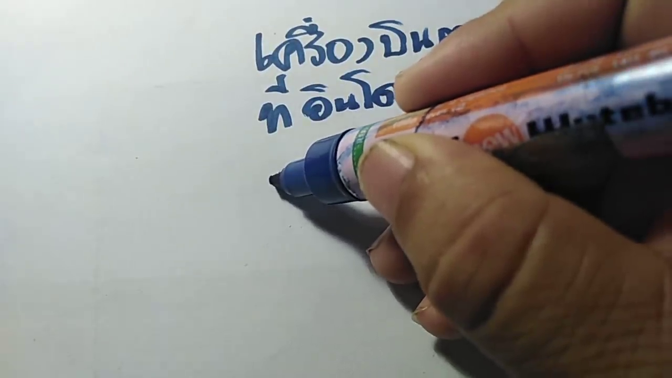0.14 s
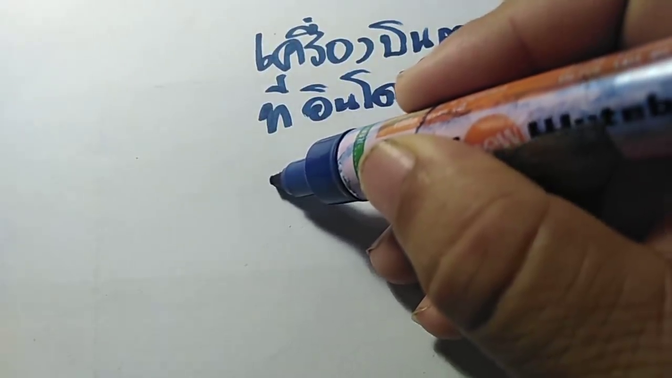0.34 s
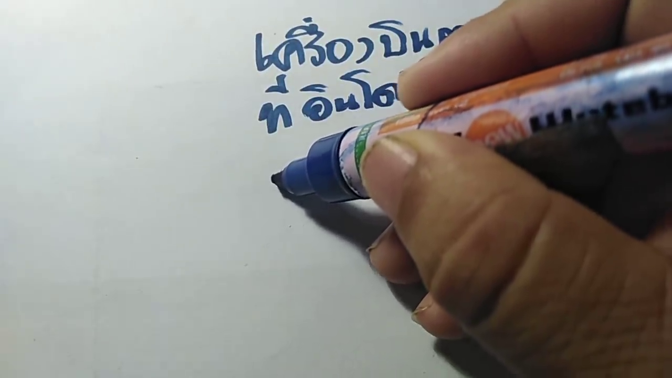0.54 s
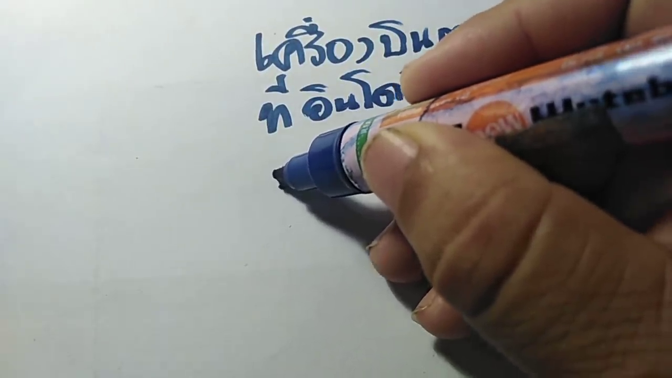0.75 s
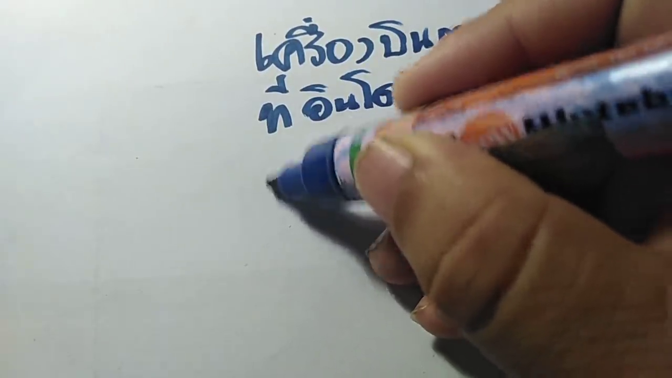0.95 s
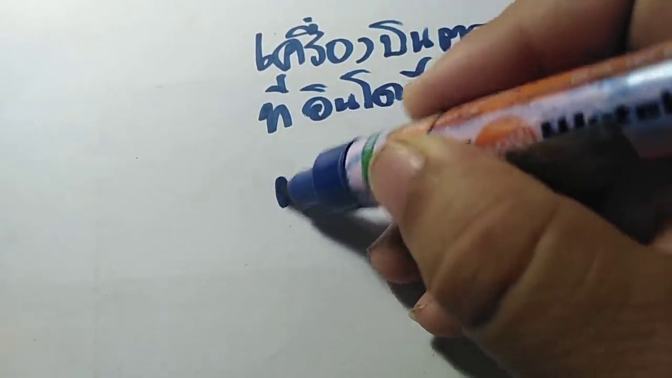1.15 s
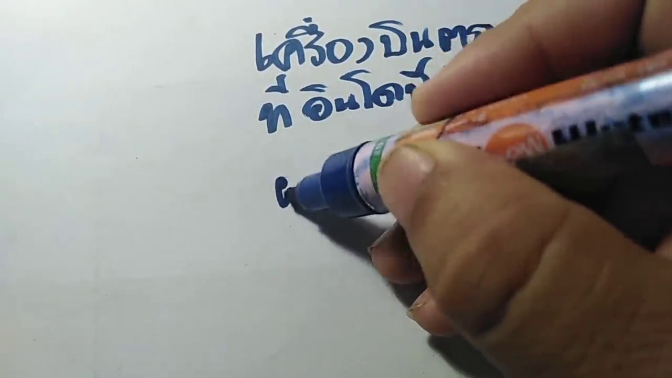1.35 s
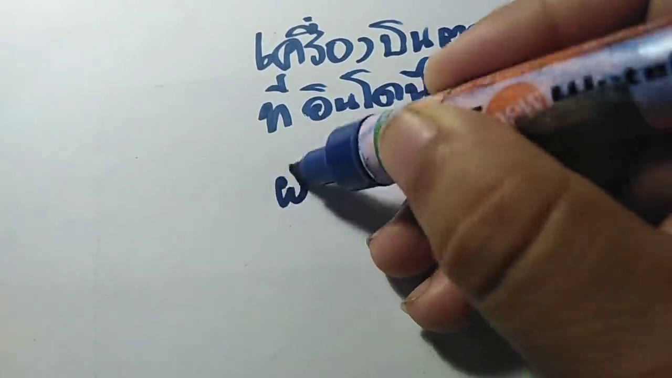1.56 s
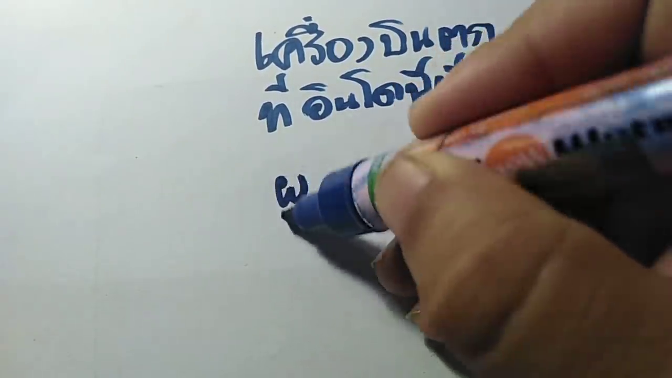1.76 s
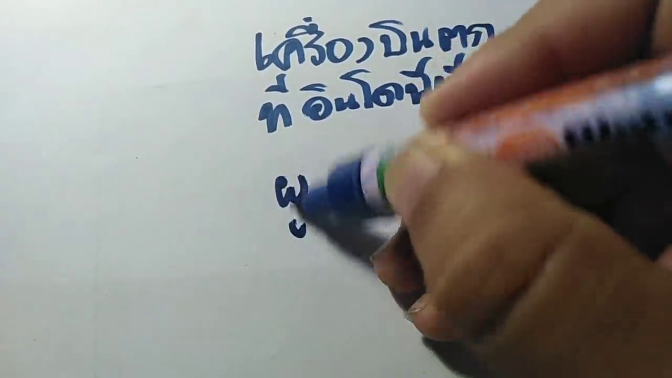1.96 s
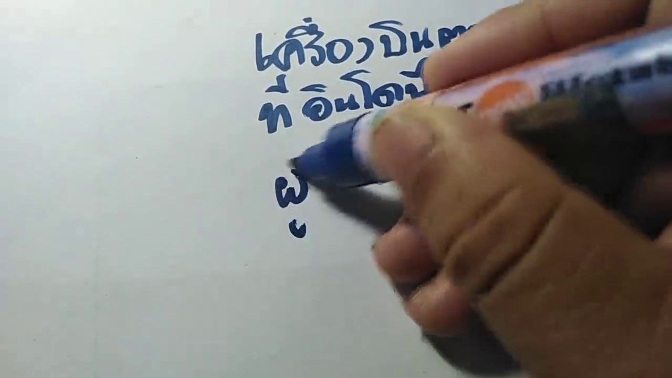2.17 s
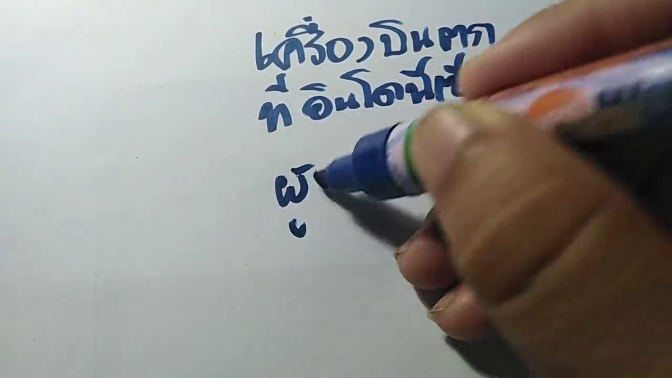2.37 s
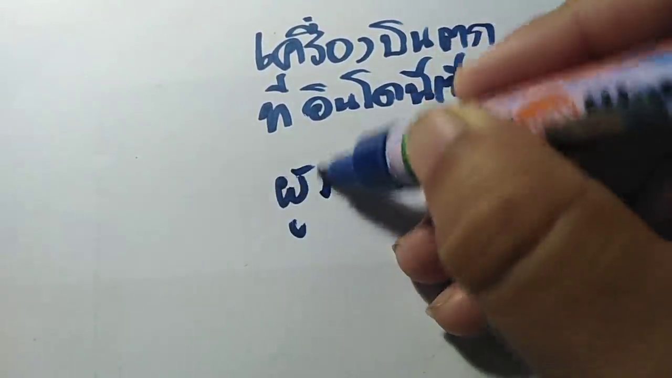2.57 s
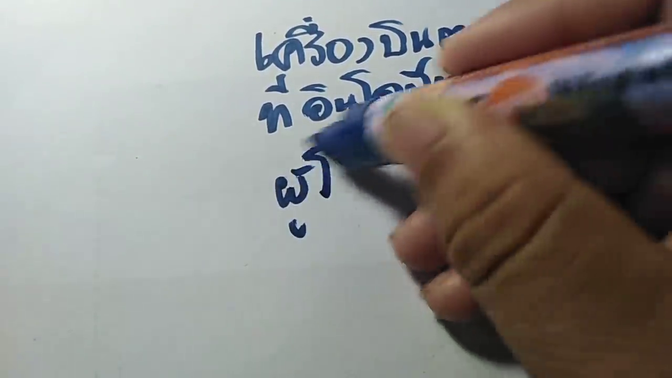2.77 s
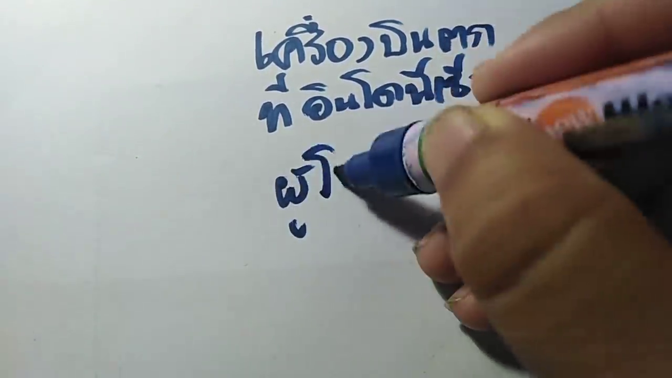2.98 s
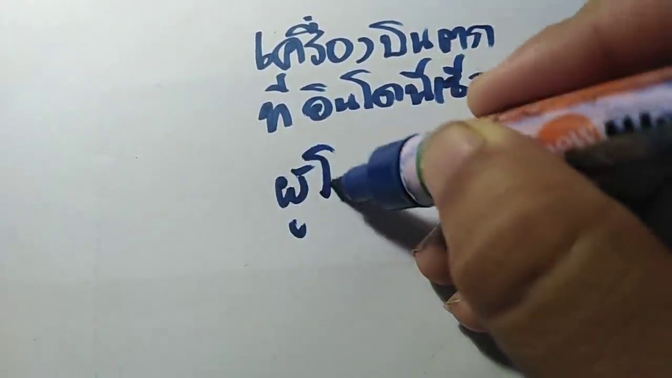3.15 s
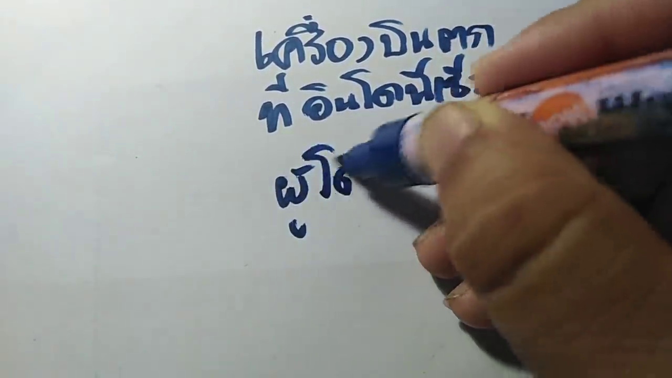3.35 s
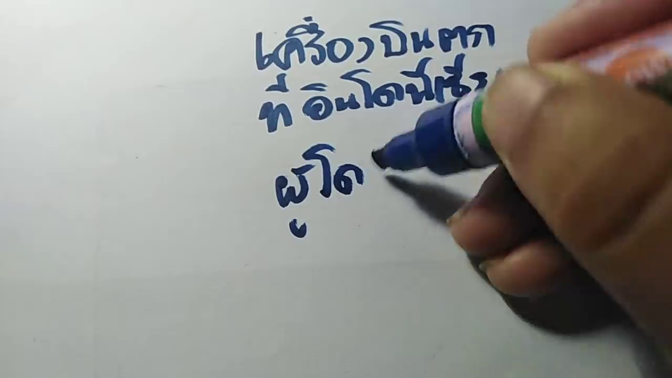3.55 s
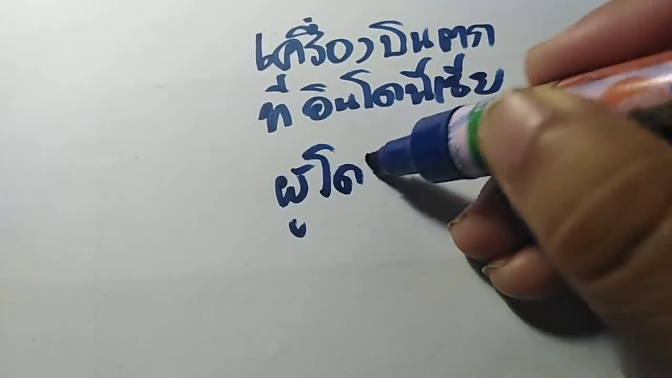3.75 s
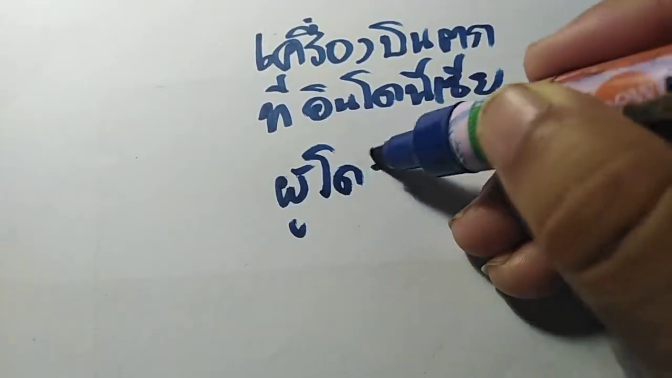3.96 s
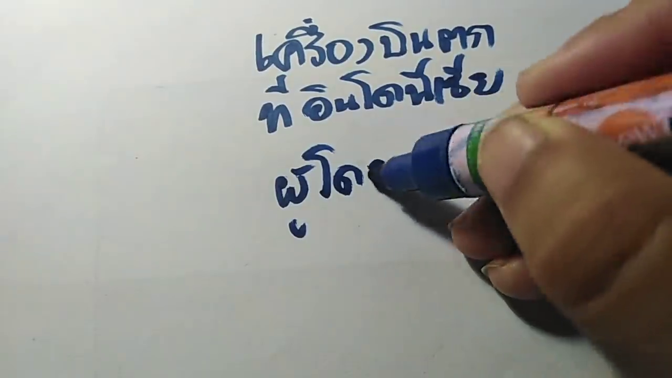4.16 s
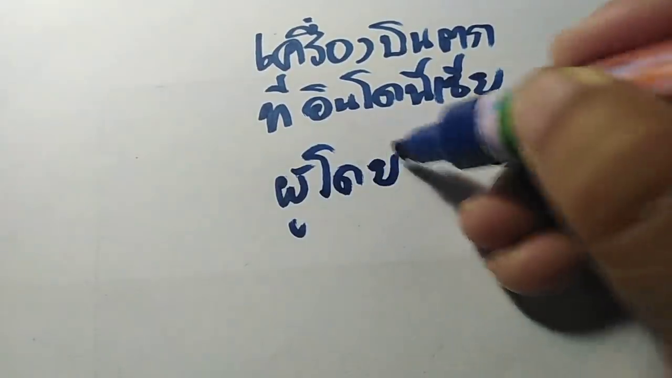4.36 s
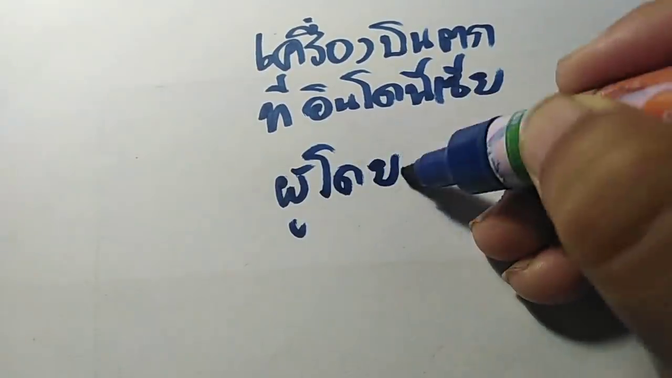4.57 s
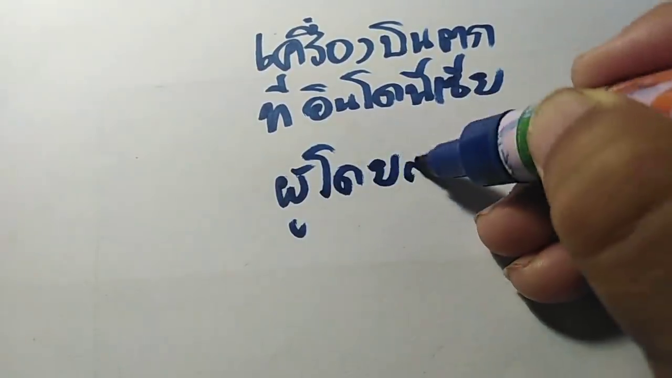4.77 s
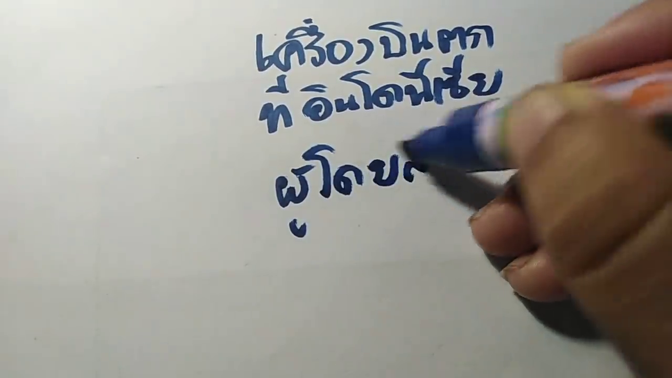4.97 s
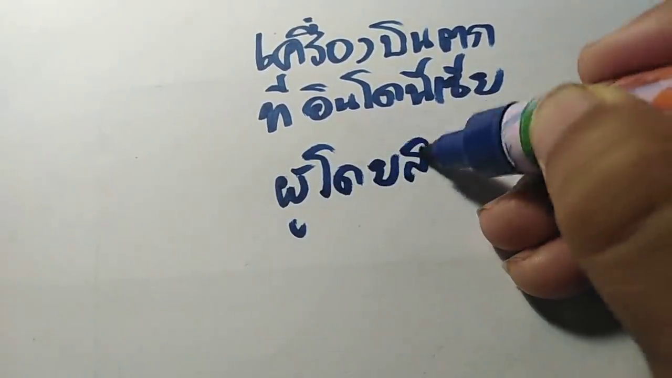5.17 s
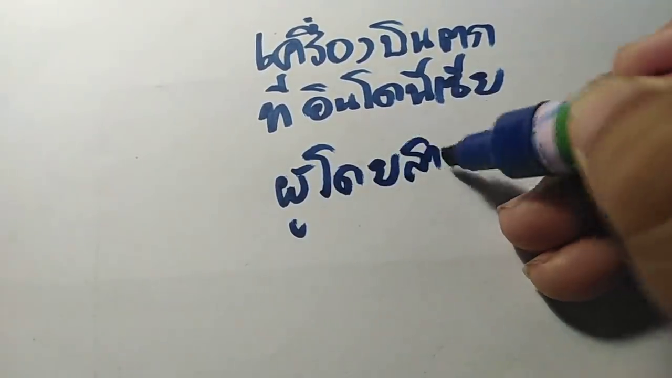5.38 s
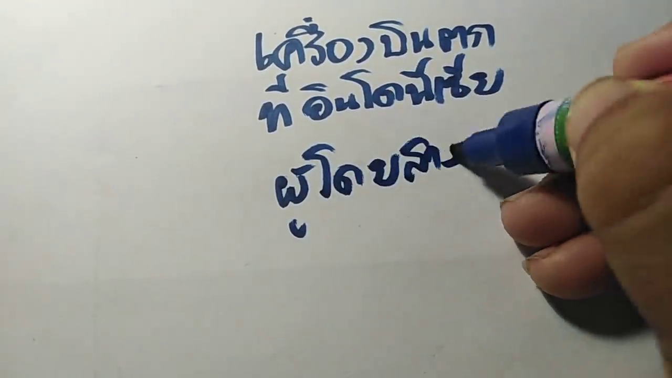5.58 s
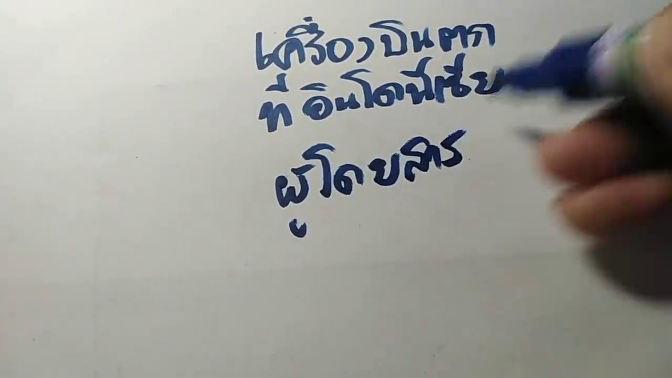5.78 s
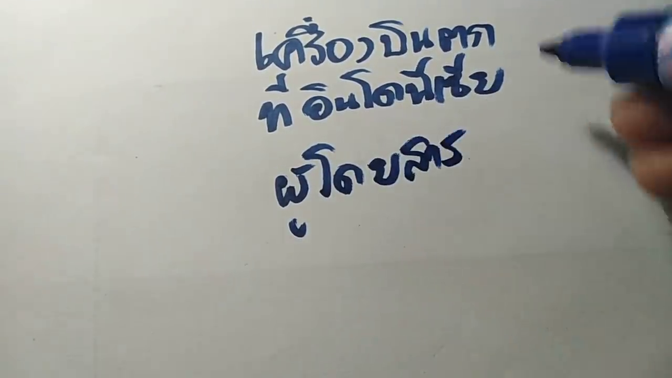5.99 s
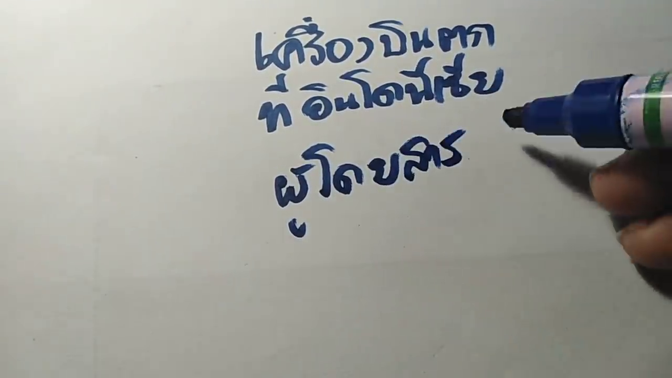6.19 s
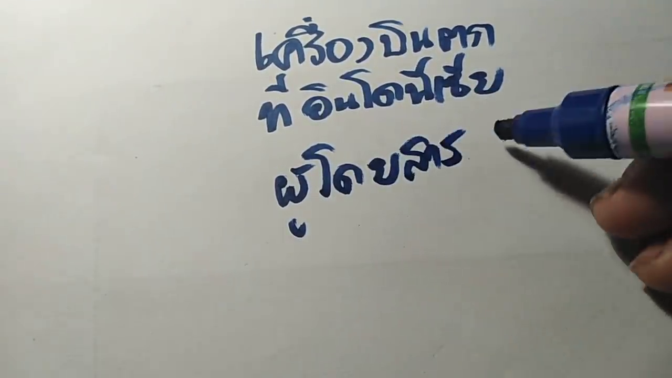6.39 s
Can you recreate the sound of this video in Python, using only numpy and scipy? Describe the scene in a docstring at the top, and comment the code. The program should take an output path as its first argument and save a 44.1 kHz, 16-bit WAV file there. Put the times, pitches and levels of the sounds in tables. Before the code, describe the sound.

Quiet fan air and a few dull bumps on the microphone come first, then dry, hissy marker scratches in quick irregular strokes with short gaps. The strokes grow denser and sharper midway, a hard tap falls between words' strokes, and the last loud rasp leaves near silence. Close stereo pickup, small room, light reflections.

```python
"""In a small room, a felt-tip marker writes on a sheet of paper on a desk, close to a two-port microphone.
Scratch: the nib snags on paper fibres and the random impulses ring a filter shaped like pen and paper.
The nib ticks (impulse and decaying noise rattle); fingers thump the microphone's housing (low sine swings).
The hand's brushing is soft filtered noise; the fan is wavering noise with a few blurred motor tones.
Noise tails add the close reflections and the room."""
import sys
import numpy as np
from scipy import signal
from scipy.fft import rfft, irfft, next_fast_len
from scipy.io import wavfile
from scipy.ndimage import uniform_filter1d, map_coordinates

SR = 44100
rng = np.random.default_rng(int(sys.argv[2]) if len(sys.argv) > 2 else 0)


def log_audio(samples):
    """Write samples as a 16-bit WAV file to the path given in sys.argv[1]."""
    # one column per channel
    frames = np.atleast_2d(samples).T
    # limit to full scale, then quantise
    limited = np.clip(frames, -1, 1)
    pcm = np.round(limited * 32767).astype(np.int16)
    wavfile.write(sys.argv[1], SR, pcm)


N = 283386
TIME_S = np.arange(N) / SR


def scratch():
    """Dense fibre snags over a smooth felt rub, fluttering with the paper's grain, ring the pen."""
    strength, (sheet_db, rasp_db, fizz_db, pan_db) = contact()
    rub = amp(-6.5) * rng.standard_normal((2, N))
    force = unit(snags(per_second=6000, spread_db=0, own_db=-7.0) + rub)
    flutter = unit(amp(0.53 * wobble(70) + 0.54 * wobble(400)))
    ring = pen_ring(drifting(force, path_s=0.00018) * flutter * strength)
    ring = patches(ring, depth_db=3.5)  # the shifting grip moves the resonances

    # low to high: sheet, flat of the nib, barrel, edge of the nib
    sheet = filtered(ring, lambda hz: along([(4000, 1), (4700, 0)], hz))
    rasp = filtered(ring, lambda hz: along([(5650, 1), (6100, 0)], hz)) - sheet
    fizz = filtered(ring, lambda hz: along([(8400, 0), (9400, 1)], hz))
    barrel = ring - sheet - rasp - fizz
    turned = barrel + amp(sheet_db) * sheet + amp(rasp_db) * rasp + amp(fizz_db) * fizz
    return panned(turned, pan_db)


# Pen strokes: start_s, length_s, rise_s (to top speed), level_db (drive at top speed),
# swell_db (ends to top), sheet_db, rasp_db, fizz_db (band gains), pan_db (left over right)
PEN_STROKES = [ (0.732, 0.27, 0.12, -58.5, 11.5, -8, -27, -7.5, -5.5),
               (0.951, 0.17, 0.045, -37, 21, -10, -9, -4, -1.5),
               (1.155, 0.12, 0.061, -37.5, 18.5, -11.5, -6.5, 0.5, -3.5),
               (1.31, 0.083, 0.017, -39.5, 17, -4.5, -6.5, -2, 2),
               (1.405, 0.17, .078, -42.5, 17.5, -3.5, -5.5, -0.5, -2.5),
               (1.509, 0.094, 0.051, -32, 15, 3.5, -6.5, -4, 2.5),
               (1.81, 0.028, 0.0098, -51.5, 10, -23, -24, 4, -5),
               (1.858, 0.096, 0.021, -42, 11.5, -9.5, -8.5, -2, -1),
               (1.954, 0.043, 0.021, -32, 19.5, -9.5, -8.5, -5, -1),
               (2.064, 0.082, .04, -49, 4, -9, -13, 3, 1.5),
               (2.19, 0.072, 0.054, -37, 16.5, -3.5, -9, 3, -1.5),
               (2.463, 0.014, 0.0053, -53.5, 4.5, -6, -21.5, -1, -3.5),
               (2.48, 0.077, 0.012, -62, 4.5, -8.5, -17, -2, -3),
               (2.599, 0.062, 0.007, -30, 4.5, -6, -7, 0.5, 1),
               (2.667, 0.06, 0.013, -38.5, 4.5, 6.5, -8.5, -1.5, 3.5),
               (2.714, 0.056, 0.051, -32, 12, 2, -7.5, 4.5, -2.5),
               (2.801, 0.053, 0.017, -25.5, 17.5, -3, -7.5, 0.5, -2),
               (3.003, 0.0051, .004, -50, 7.5, -14, -13, -3, -5),
               (3.027, 0.0091, 0.0037, -50, 9, -18, 0, -3, -4),
               (3.063, 0.062, 0.049, -39, 5, -2, -6, 0.5, -4.5),
               (3.142, 0.095, 0.0074, -44.5, 7, 0, -1.5, 2.5, -1),
               (3.243, 0.14, 0.18, -44, 6.5, -6, -4, 0.5, 1),
               (3.38, 0.049, 0.024, -31.5, 10, -1.5, -13, 2, -6.5),
               (3.433, .038, 0.045, -35, 7, 4.5, 2, 3.5, -1), (3.5, 0.064, 0.05, -41.5, 9, 4, -7, 4.5, 5),
               (3.738, 0.049, 0.02, -59.5, 2.5, 5, -4.5, 1, 0.5),
               (3.81, 0.029, .005, -51, 8, 2.5, -8, 0, 0), (3.89, 0.088, 0.052, -52, 8, -3, -7, -3.5, -5),
               (3.999, 0.097, 0.085, -37.5, 15.5, -4.5, -6, -1.5, -1),
               (4.109, 0.057, 0.018, -44, 8, -7, -5.5, -4.5, 0.5),
               (4.179, 0.048, 0.024, -36.5, 11, -9, 1.5, -4.5, 2.5),
               (4.253, 0.087, .06, -38, 17, 0, -5.5, -5.5, -3),
               (4.322, 0.075, 0.044, -24.5, 13, -2, 3, -6, 4.5),
               (4.614, 0.046, 0.011, -48.5, 8, -14, -0.5, -1, 4.5),
               (4.696, 0.066, 0.03, -36, 11.5, 0.5, -1, 0.5, 3),
               (4.751, 0.082, .03, -40, 10.5, 1, -8, -5.5, 0),
               (4.874, 0.17, 0.023, -45.5, 8, -7.5, 1, 0, 2),
               (4.986, 0.072, 0.068, -30.5, 15, 0, -11, -1, -1.5),
               (5.084, 0.067, 0.01, -27.5, 17.5, -3.5, -1, -0.5, -1),
               (5.261, 0.041, 0.018, -37.5, 4.5, -1, -0.5, 1, -2),
               (5.32, 0.042, 0.029, -31.5, 11, 2.5, -1, 1.5, -1),
               (5.529, .12, .065, -47, 3.5, -14, -2, -2.5, -3.5),
               (5.659, 0.057, 0.054, -29, 17.5, -1, -7, -1, 2.5),
               (5.754, 0.033, 0.0047, -23.5, 13.5, -0.5, 2.5, 1.5, -1.5),
               (5.855, 0.044, 0.013, -47.5, 9.5, -0.5, -11, 2, 9.5),
               (6.139, 0.03, .013, -55.5, 8.5, -9, -30, 1.5, 12.5)]
LAND_S, LIFT_S = 0.0057, 0.004  # e-fold times of the nib taking hold and letting go
SWELL_BEND = 1.007  # 1 = pointed swell, more = rounder


def contact():
    """The nib lands, speeds up, slows and lifts; faster is louder. Returns strength and grip (tone, pan)."""
    power, grip = np.full(N, 1e-14), np.zeros((4, N))
    for start_s, length_s, rise_s, level_db, swell_db, *colour_db in PEN_STROKES:
        near = slice(*np.searchsorted(TIME_S, [start_s - 0.05, start_s + length_s + 0.1]))
        age_s = TIME_S[near] - start_s
        slowness = np.interp(age_s, [0, min(rise_s, length_s), length_s], [1, 0, 1])
        landing = np.minimum(age_s, 0) / LAND_S
        lifting = np.maximum(age_s - length_s, 0) / LIFT_S
        stroke_db = level_db - swell_db * slowness ** SWELL_BEND
        stroke = (np.exp(landing - lifting) * amp(stroke_db)) ** 2
        power[near] += stroke
        grip[:, near] += np.outer(colour_db, stroke)
    return np.sqrt(power), grip / power


def snags(per_second, spread_db, own_db):
    """Fibres let go at random moments with random sizes; each port hears each a little differently."""
    hit = rng.random(N) < per_second / SR
    sizes = hit * rng.choice([-1, 1], N) * amp(spread_db * rng.standard_normal(N))
    return unit(sizes * (1 + amp(own_db) * rng.standard_normal((2, N))))


def drifting(force, path_s):
    """As the hand moves, the paths to the two ports differ by a changing delay."""
    lag = np.round(path_s * SR * wobble(4)).astype(int)
    delayed = force[1, np.clip(np.arange(N) - lag, 0, N - 1)]
    return np.array([force[0], delayed])


# Ring of pen and paper at each port: freq_hz, relative_db
PEN_RING_LEFT = [(500, -40), (1200, -34), (1800, -26.5), (2400, -32), (3300, -30.5), (4100, -25),
                 (5000, -12), (6300, -11), (6800, -13.5), (7600, -9), (8200, -10), (9500, -19),
                 (11500, -23), (13000, -31)]
PEN_RING_RIGHT = [(900, -36), (1750, -22), (2400, -28.5), (3300, -27.5), (4150, -19.5), (4900, -10),
                  (5500, -7), (5980, -12.5), (6600, 0), (7400, -3.5), (8400, -17), (10400, -19),
                  (12300, -27), (14000, -30)]


def pen_ring(force, size=2048):
    """Force rings pen and paper through a minimum-phase filter (port mean of unit energy)."""
    hz = np.fft.rfftfreq(size, 1 / SR)
    gain = amp([along(PEN_RING_LEFT, hz), along(PEN_RING_RIGHT, hz)])
    # folding the cepstrum makes the ring causal
    cepstrum = irfft(np.log(gain))[:, :size // 2] * np.r_[1, np.full(size // 2 - 1, 2)]
    ring = irfft(np.exp(rfft(cepstrum, size)))
    ring = ring / np.linalg.norm(ring.mean(0))
    return signal.fftconvolve(force, ring, axes=1)[:, :N]


# Nib taps or catches: time_s, blow_db (impulse into the ring)
NIB_TICKS = [(2.8025, -20.5), (3.506, -36), (3.539, -33), (3.557, -29), (3.711, -43), (4.492, -11.5),
             (4.6663, -33), (5.756, -20.5)]


def ticks(rattle_db, rattle_s, pan_db):
    """One sharp blow on the pen and a brief rattle of the nib in its holder."""
    force, age_s = np.zeros((2, N)), np.arange(SR // 40) / SR
    for time_s, blow_db in NIB_TICKS:
        blow = amp(rattle_db) * rng.standard_normal((2, len(age_s))) * np.exp(-age_s / rattle_s)
        blow[:, 0] = 1
        force[:, round(time_s * SR):][:, :len(age_s)] += amp(blow_db) * blow
    return panned(pen_ring(force), pan_db)


# Handling thumps: time_s, level_db (mean of ports), pitch_hz, pan_db (left over right)
HANDLING_THUMPS = [(.534, -28.5, 124, -38), (0.673, -36.5, 87, -31), (0.695, -29.5, 83, -29),
                   (.823, -34, 82, -7), (0.857, -42, 117, 16), (1.104, -41, 82, 25), (1.175, -37, 88, 29),
                   (1.198, -36, 98, 31), (1.229, -40, 79, 30), (1.398, -35.5, 90, 28),
                   (1.492, -31.5, 82.5, 27), (1.552, -36, 102, 11), (1.709, -40.5, 77, 24),
                   (1.851, -40, 127, 28), (3.008, -36.5, 161, -2.5), (3.554, -36, 298, -10),
                   (5.496, -36, 170, -1.5), (5.599, -38, 80, 22), (5.629, -34, 95.2, 20),
                   (5.76, -31, 108.4, 21.5), (5.797, -33, 81, 24), (5.893, -37.5, 125, 22.5)]


def thumps(cycles, delay_s, shudder_db, shudder_s):
    """Fingers knock the microphone's housing, mostly at one port: about a cycle of swing in a noisy shudder."""
    out = np.zeros((2, N))
    shudder_spectrum = [(40, -12.0), (80, 3.5), (220, -1.5), (350, -21.5), (700, -25.5), (1500, -65)]
    shudder = amp(shudder_db) * rush(shudder_spectrum)
    phases = rng.uniform(0, 2 * np.pi, len(HANDLING_THUMPS))
    for (time_s, level_db, pitch_hz, pan_db), phase in zip(HANDLING_THUMPS, phases):
        age_s = TIME_S - time_s - delay_s
        swing = np.exp(-(age_s * pitch_hz / cycles) ** 2) * np.sin(2 * np.pi * age_s * pitch_hz + phase)
        shake = shudder * np.exp(-(age_s / shudder_s) ** 2)
        ports = panned(1, pan_db)
        out += amp(level_db) * ports / ports.mean() * (swing + shake)
    return out


# Sliding hand's soft rush: freq_hz, relative_db
HAND_SPECTRUM = [(70, -33.5), (130, -6), (280, -4.5), (420, -10), (800, -16.5), (1200, -21.5),
                 (1550, -29.5), (2000, -44.5), (4000, -83.5)]
# Hand leaning on the sheet while the word is written: time_s, level_db
HAND_LEAN = [(0, -65), (2.7, -57), (5.8, -58), (6.43, -64)]
# Hand shifts along the sheet: time_s, half_s (centre to 1/e), level_db
HAND_SHIFTS = [(1.196, 0.025, -57), (1.98, 0.05, -58.5), (3.556, 0.021, -50.5)]


def hand():
    """The side of the hand brushes the sheet, louder each time it shifts."""
    slide = amp(np.interp(TIME_S, *np.transpose(HAND_LEAN)))
    for time_s, half_s, level_db in HAND_SHIFTS:
        slide = slide + amp(level_db) * np.exp(-((TIME_S - time_s) / half_s) ** 2)
    drag_db = 1.6 * wobble(12)
    return slide * amp(drag_db) * rush(HAND_SPECTRUM)


# Fan's rush: freq_hz, relative_db
FAN_AIR = [(25, -16), (55, -12), (92, -2), (150, -16.5), (235, -9.5), (330, -22.5), (480, -24), (730, -17),
           (880, -22.5), (1060, -17), (1330, -25.5), (1520, -39), (2000, -48), (3000, -49), (3700, -55),
           (7000, -49), (10000, -55), (14000, -58.5)]
# Fan's motor lines: freq_hz, relative_db
FAN_HUM = [(102.3, -60), (220.7, -65), (301.5, -68.5), (398.4, -69.5), (516.8, -76), (699.8, -72)]


def fan():
    """A softly wavering rush and motor lines that blur more the higher they lie."""
    hum = 0
    for freq_hz, relative_db in FAN_HUM:
        level = amp(relative_db + 2.7 * wobble(6))
        blur_rad = (0.39 + freq_hz / 500) * wobble(30)
        hum = hum + level * np.sin(2 * np.pi * freq_hz * TIME_S + blur_rad)
    air = amp(-56.0 + 0.51 * wobble(6.3)) * patches(rush(FAN_AIR), depth_db=3.6)
    return air + amp(2.5) * hum


def near_reflections(rub):
    """Close reflections of hand and desk: a short diffuse tail on the scratch."""
    return amp(-6.5) * echoes(rub, [(2000, 0.037), (9000, 0.054)])


# Pen's broader radiation into the room than toward the microphone: freq_hz, gain_db
PEN_SPILL = [(1000, 20.5), (2000, 15.5), (3000, 13.5), (4000, 8.5), (5000, -2), (5900, 0), (6700, -1.5),
             (7500, -2.5), (8500, 3.5), (12000, 3.5)]
# Room decay: freq_hz, t60_s
ROOM_DECAY = [(200, 1), (2000, 0.32), (7000, 0.59), (14000, 0.5)]


def room_tail(pen):
    """The room's diffuse tail, fed by the pen's broader radiation."""
    spill = filtered(pen, lambda hz: amp(along(PEN_SPILL, hz)))
    return amp(-16.0) * echoes(spill, ROOM_DECAY)


def echoes(x, t60, size=128):
    """Convolve with a decaying noise tail of unit energy per port; t60 is (freq_hz, t60_s) points."""
    hz, age_s, z = signal.stft(rng.standard_normal((2, SR * 3 // 4)), SR, nperseg=size)
    decay_db = -60 * age_s / along(t60, hz)[:, None]
    tail = signal.istft(z * amp(decay_db), SR, nperseg=size)[1]
    tail = tail / np.linalg.norm(tail, axis=1, keepdims=True)
    return signal.fftconvolve(x, tail, axes=1)[:, :N]


def patches(x, depth_db, size=512):
    """Narrow bands swell and fade by turns while the overall loudness stays the same."""
    z = signal.stft(x, nperseg=size)[2]
    field = rng.standard_normal(z.shape)
    for _ in range(2):
        field = uniform_filter1d(uniform_filter1d(field, size=5, axis=1), size=14, axis=2)
    shaded = z * amp(depth_db * unit(field))
    loudness = lambda v: np.linalg.norm(v, axis=1, keepdims=True) + 1e-12
    return signal.istft(shaded * loudness(z) / loudness(shaded), nperseg=size)[1][:, :N]


# Left-right likeness of noise: freq_hz, correlation (0 to 1)
PORT_LIKENESS = [(50, 0.78), (130, 0.57), (280, 0.72), (600, 0.43), (1200, 0), (5000, 0.11)]


def rush(spectrum):
    """Stereo noise of rms 1, more alike at the two ports in the bass."""
    def response(hz):
        turn_rad = np.arccos(np.clip(along(PORT_LIKENESS, hz), -1, 1)) / 2
        return amp(along(spectrum, hz)) * [np.cos(turn_rad), np.sin(turn_rad)]

    mid, side = filtered(rng.standard_normal((2, N)), response)
    return unit(np.array([mid + side, mid - side]))


def amp(db):
    """Decibels to gain."""
    return 10 ** (np.asarray(db) / 20)


def unit(x):
    """Scale to rms 1."""
    return x / np.sqrt(np.mean(x ** 2) + 1e-20)


def along(points, hz):
    """Interpolate (freq_hz, value) points on a log axis."""
    f, v = np.transpose(points)
    return np.interp(np.log(hz + 1), np.log(f + 1), v)


def wobble(rate_hz):
    """A smooth random curve, rate_hz knots a second."""
    knots = rng.standard_normal(int(N * rate_hz / SR) + 4)
    return map_coordinates(knots, [np.arange(N) * rate_hz / SR])


def filtered(x, response):
    """Multiply the spectrum of x by a response of frequency."""
    m = next_fast_len(N + SR // 2)
    return irfft(rfft(x, m) * response(np.fft.rfftfreq(m, 1 / SR)), m)[..., :N]


def panned(x, pan_db):
    """Share x between the ports, left pan_db over right."""
    return x * amp(np.array([pan_db, -pan_db]).reshape(2, -1) / 2)


def scene():
    """Pen, its close reflections and room tail, handling thumps, hand and fan."""
    rub = scratch()
    pen = rub + ticks(rattle_db=-9, rattle_s=0.0013, pan_db=-6.5)
    handling = thumps(cycles=0.66, delay_s=0.00393, shudder_db=-14.5, shudder_s=0.03)
    return pen + near_reflections(rub) + room_tail(pen) + handling + hand() + fan()


TOP_HZ = 14300


def record(dry):
    """The recorder weakens the deepest bass and drops everything above its band limit."""
    bass_cut = [(25, -10.5), (45, -8.0), (68, -0.5)]  # freq_hz, gain_db
    return filtered(dry, lambda hz: (hz < TOP_HZ) * amp(along(bass_cut, hz)))


dry = scene()
out = record(dry)
log_audio(out)
```